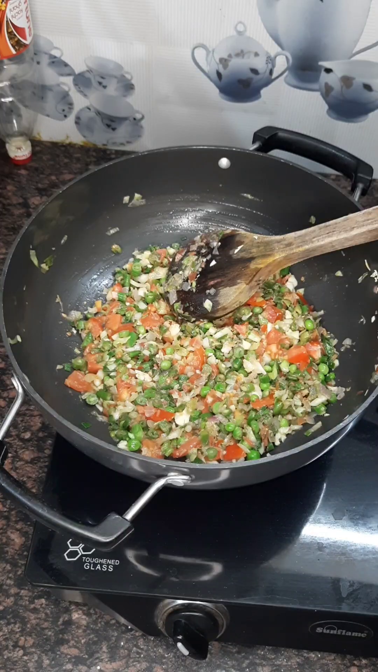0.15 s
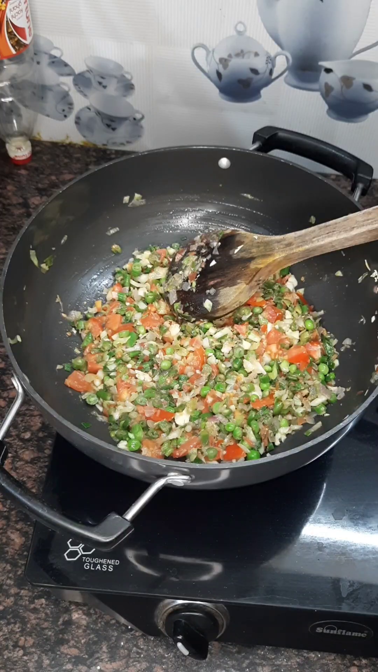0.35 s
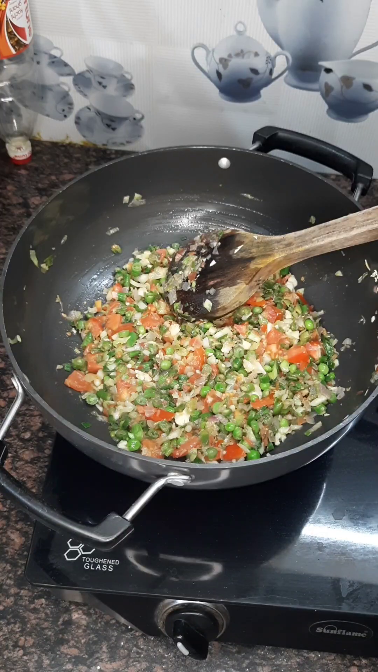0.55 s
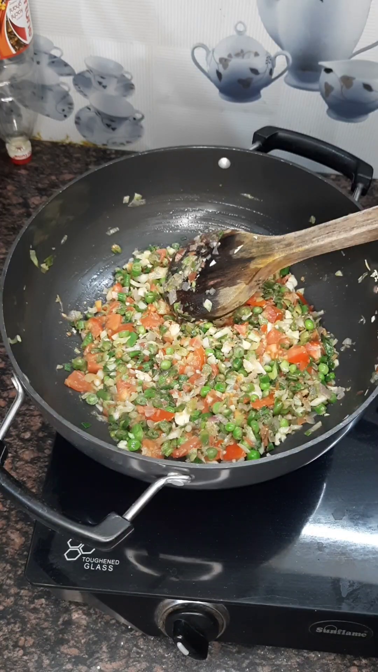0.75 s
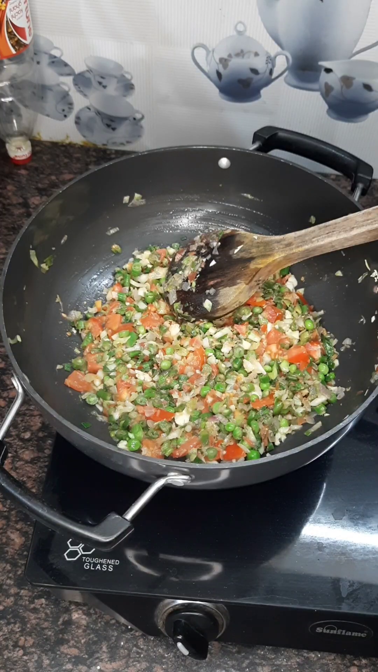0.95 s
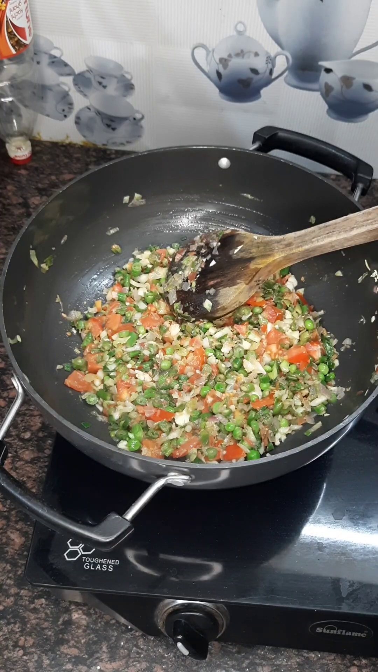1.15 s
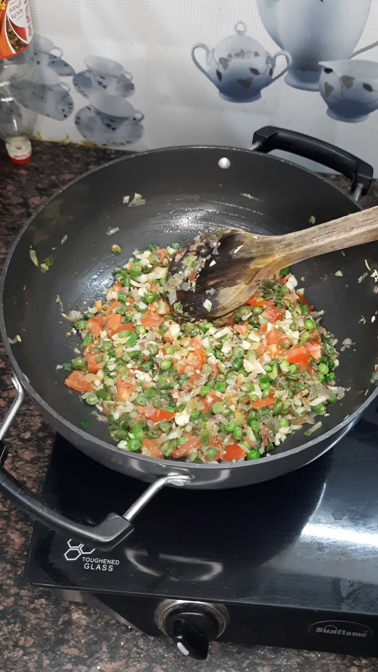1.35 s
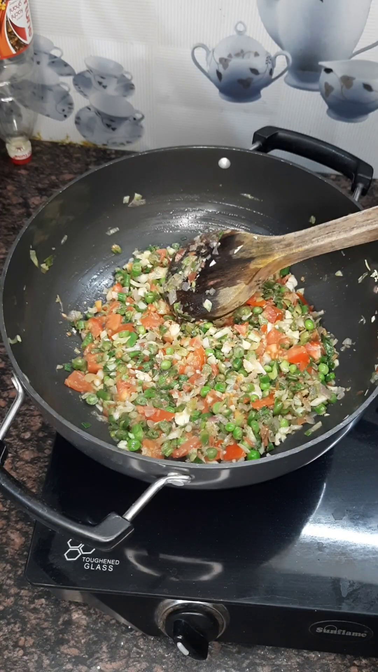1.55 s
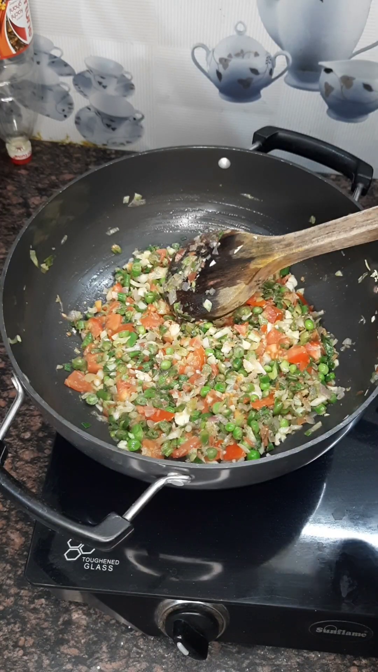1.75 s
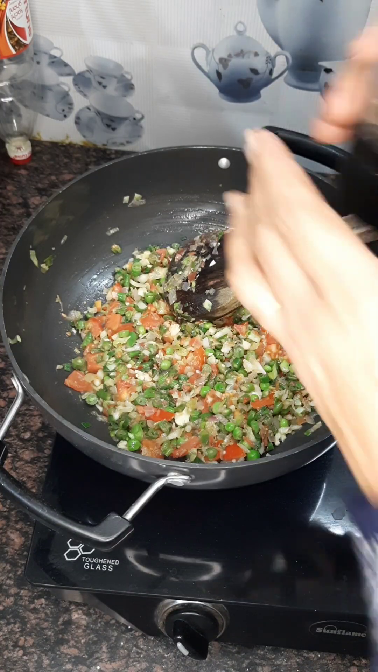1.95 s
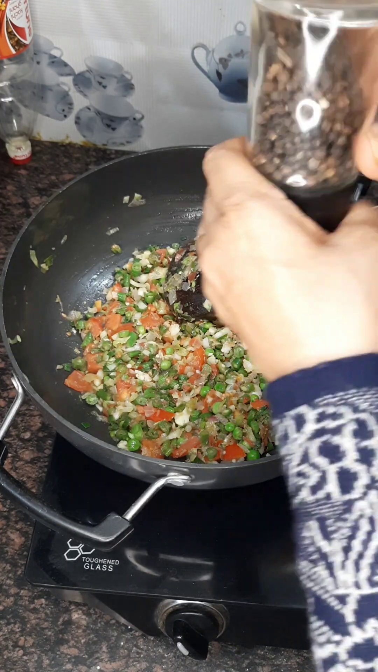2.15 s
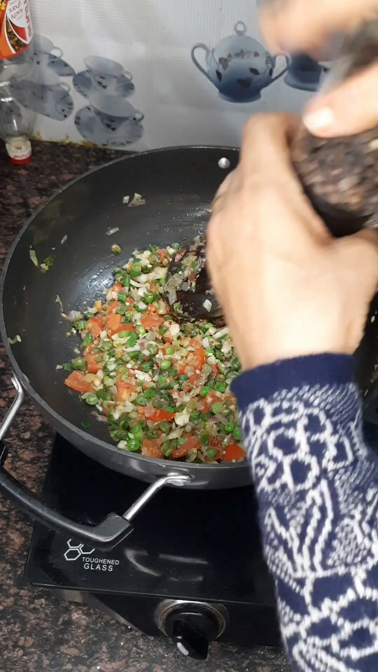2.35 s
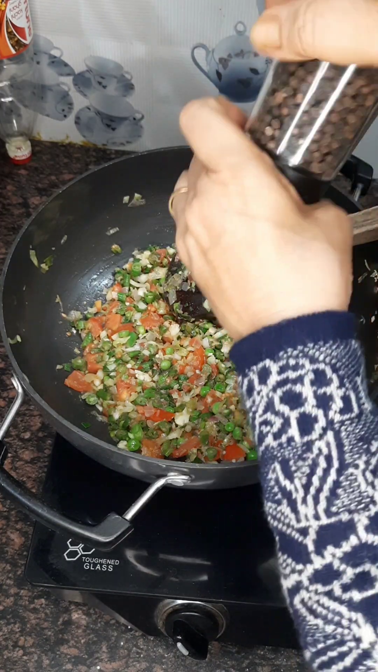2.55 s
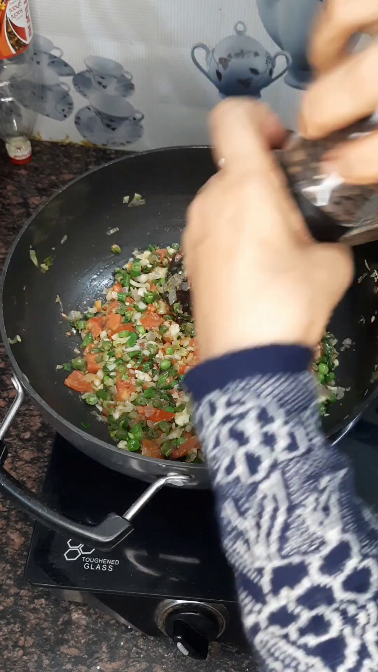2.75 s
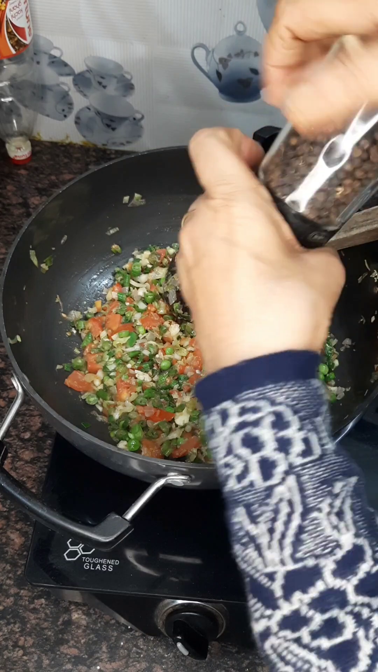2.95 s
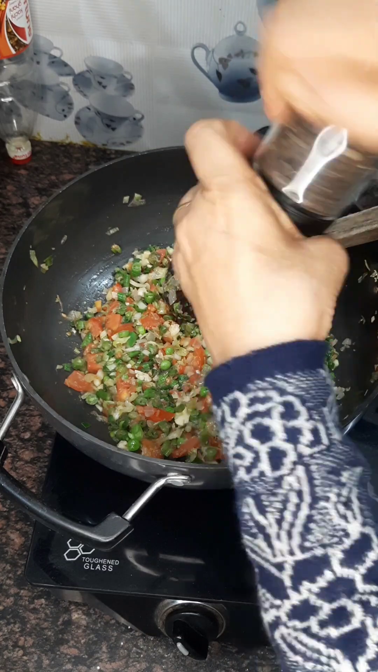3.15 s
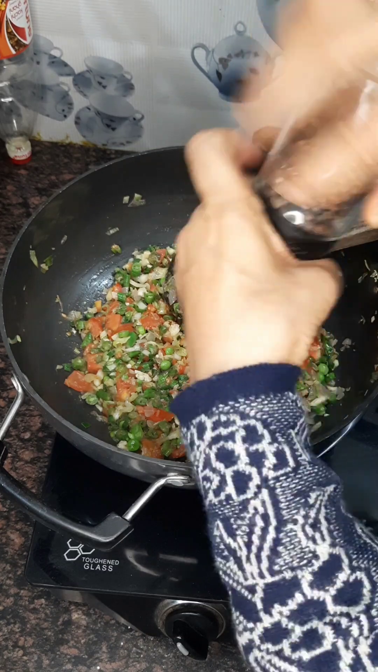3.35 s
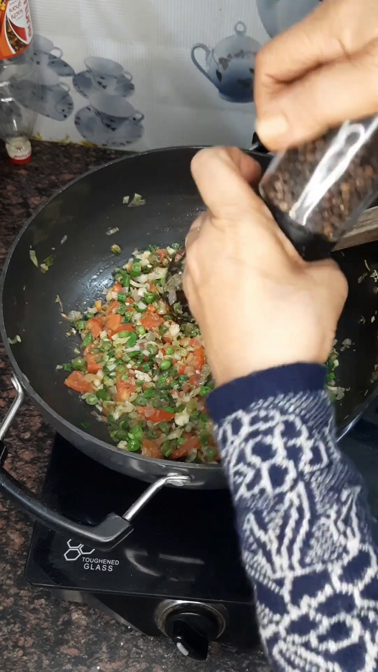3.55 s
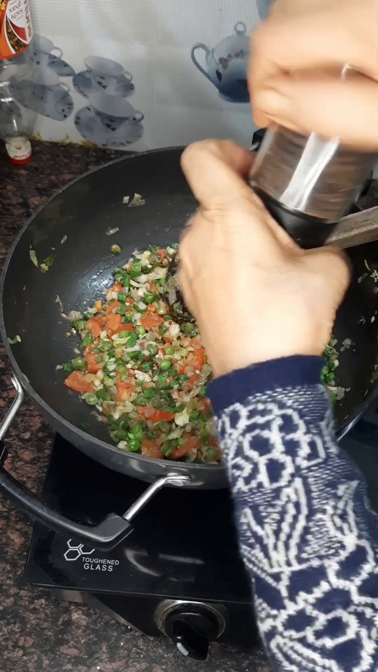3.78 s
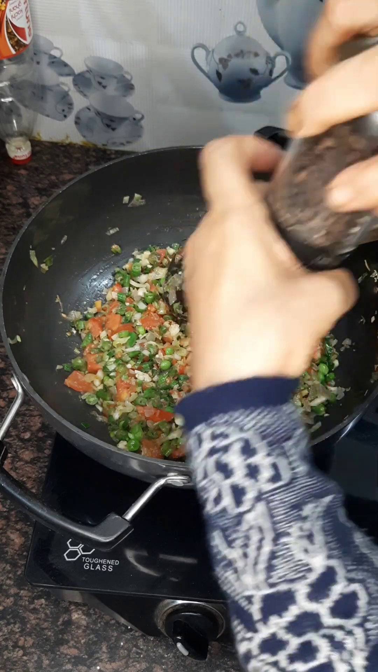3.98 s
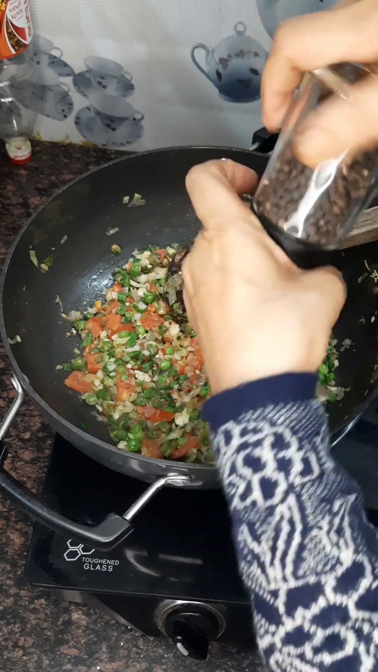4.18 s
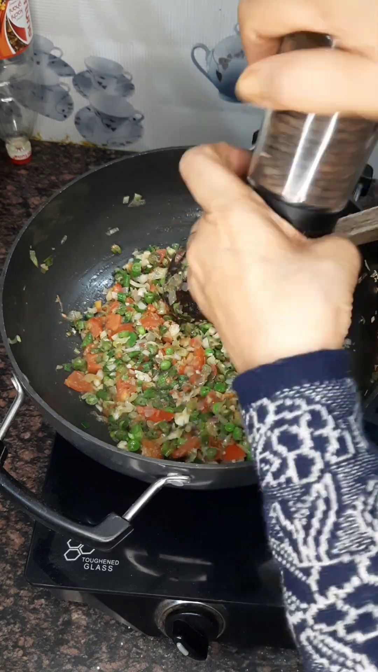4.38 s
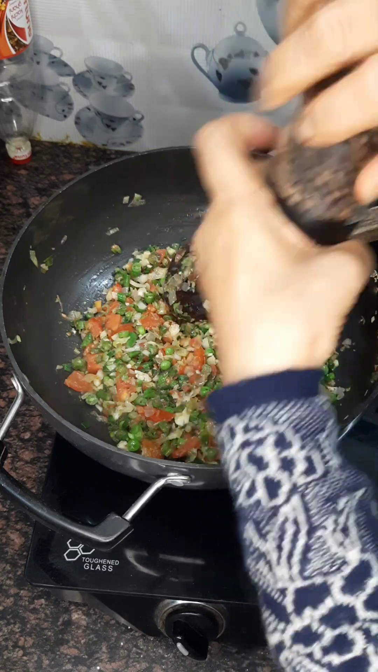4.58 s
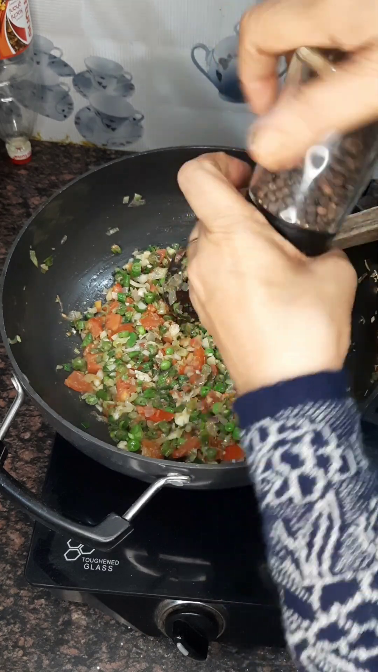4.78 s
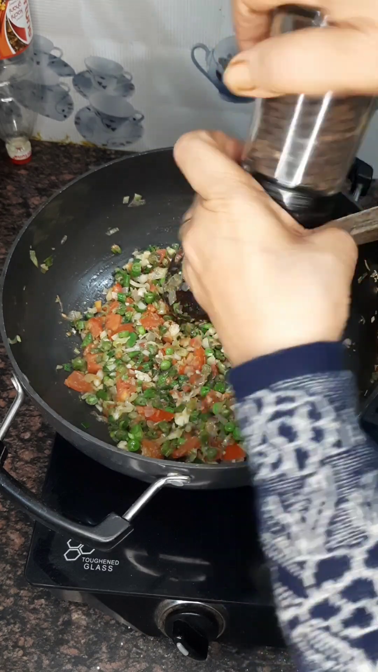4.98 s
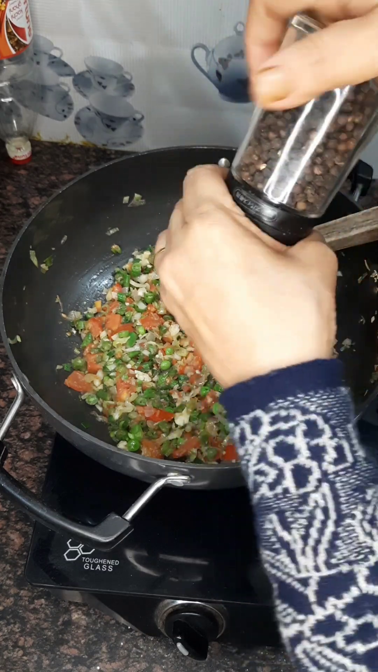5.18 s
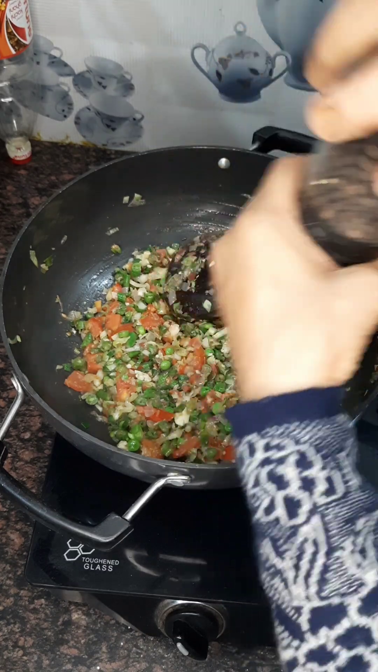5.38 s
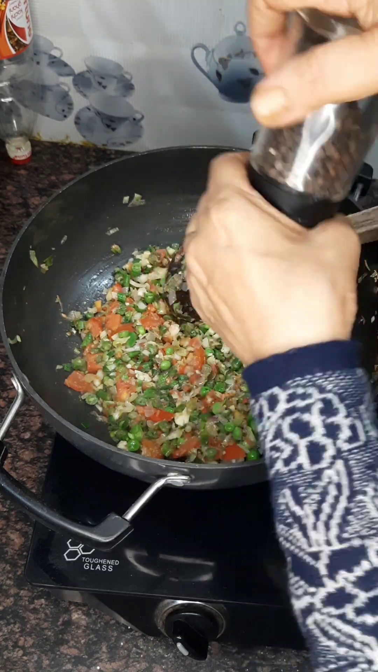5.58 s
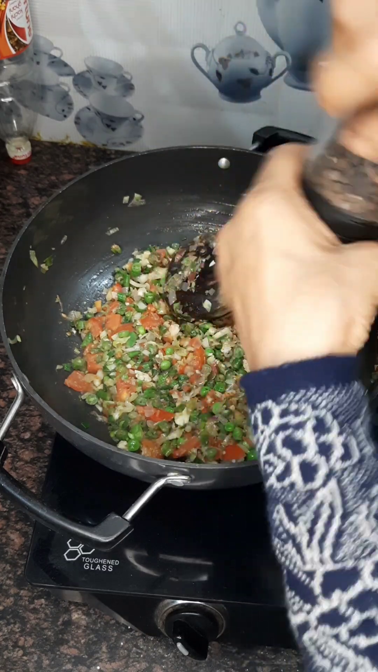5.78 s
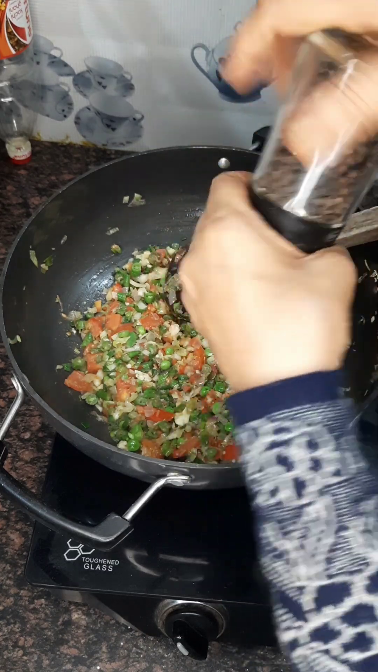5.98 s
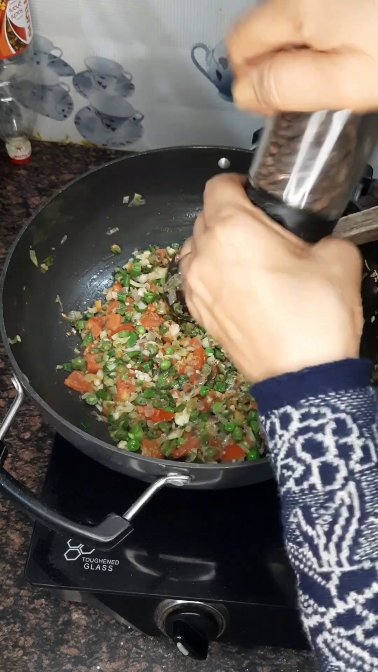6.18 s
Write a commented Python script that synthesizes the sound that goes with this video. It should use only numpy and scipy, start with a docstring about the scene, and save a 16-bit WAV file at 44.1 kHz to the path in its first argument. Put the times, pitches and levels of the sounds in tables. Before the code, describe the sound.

A cap knocks and scrapes off, then a glass pepper mill grinds in even, rasping twists over faint kitchen hiss.

```python
"""A glass pepper mill, twisted about three times a second in a tiled kitchen. The burr crunches corns
into grit that rings the mill's body; some corns crack aloud and loose ones tick on the glass.
Before the grinding, a cap is handled and pulled off with knocks and a scrape, and the jar is tipped
over a pan. Hiss, a drone, a low rumble and a few faint low tones fill the room."""
import sys
import numpy as np
from scipy import signal
from scipy.fft import rfft, irfft, next_fast_len
from scipy.io import wavfile
from scipy.ndimage import uniform_filter1d

SR = 44100
rng = np.random.default_rng(int(sys.argv[2]) if len(sys.argv) > 2 else 0)


def pcm_store(signal):
    """Save signal as 16-bit PCM."""
    levels = np.round(np.clip(np.atleast_2d(signal), -1, 1) * 32767)
    wavfile.write(sys.argv[1], SR, levels.astype(np.int16).T)


N = 274743
TIME_S = np.arange(N) / SR


def amp(db):
    return 10 ** (np.asarray(db) / 20)


def unit_rms(x):
    return x / np.sqrt(np.mean(x ** 2) + 1e-20)


def log_interp(points, hz):
    f, values = np.transpose(points)
    return np.interp(np.log(hz + 1), np.log(f + 1), values)


def curves(rows):
    """One value per sample for each column after the time."""
    times, *columns = np.transpose(rows)
    return [np.interp(TIME_S, times, column) for column in columns]


def filtered(x, response):
    size = next_fast_len(x.shape[-1] + 8192)
    return irfft(rfft(x, size) * response(np.fft.rfftfreq(size, 1 / SR)), size)[..., :x.shape[-1]]


def modes(table):
    """Causal frequency response of a set of resonances."""
    return lambda f: sum(amp(db) * 1j * f * width / (centre ** 2 - f * f + 1j * f * width)
                         for centre, width, db in table)


def ring(x, table):
    """Two passes through the resonances; rms 1."""
    return unit_rms(filtered(x, lambda hz: modes(table)(hz) ** 2))


def coloured(x, spectrum):
    """Minimum-phase filter through (frequency [Hz], level [dB]) points."""
    cepstrum = irfft(log_interp(spectrum, np.fft.rfftfreq(2048, 1 / SR)) * np.log(10) / 20)
    cepstrum[1:1024] *= 2
    cepstrum[1025:] = 0
    return signal.fftconvolve(x, irfft(np.exp(rfft(cepstrum))))[:len(x)]


def grains(per_s, spread_db):
    """Random impulses of uneven size; rms 1."""
    size_db = spread_db * np.minimum(rng.exponential(size=N), 3)
    return unit_rms((rng.random(N) < per_s / SR) * rng.standard_normal(N) * amp(size_db))


def flutter(depth_db, below_hz):
    """Randomly wandering gain."""
    return amp(depth_db * unit_rms(filtered(rng.standard_normal(N), lambda hz: hz < below_hz)))


def stroke_db(full_s, rise_s, hold_s, fall_db_per_s):
    """Climbs 31 dB per rise_s, holds at 0 dB from full_s, then falls."""
    t = TIME_S - full_s
    return np.minimum(31 * t / rise_s, 0) - fall_db_per_s * np.maximum(t - hold_s, 0)


# Diffuse field: (frequency [Hz], left-right correlation [ratio])
CORRELATION = [(60, 0.98), (150, 0.92), (380, 0.86), (950, 0.053), (2380, 0.22), (5980, 0.086),
               (15000, 0.17)]


def diffuse(pair):
    """Two unrelated signals become left and right, alike in the bass only."""
    angle = lambda hz: np.arccos(log_interp(CORRELATION, hz)) / 2
    mid, side = filtered(pair, lambda hz: np.array([np.cos(angle(hz)), np.sin(angle(hz))]))
    return np.array([mid + side, mid - side])


# Kitchen reverberation: (frequency [Hz], T60 [s])
WALL_T60 = [(100, 1), (500, 0.35), (2000, 0.38), (6000, 0.41), (14000, 0.28)]


def room(x, wet_db, pan_db, left_lag_samples):
    """Panned direct sound plus a tail in which each frequency dies at its own speed."""
    hz, t, bins = signal.stft(rng.standard_normal((2, SR // 2)), SR, nperseg=256)
    tail = signal.istft(bins * amp(-60 * t / log_interp(WALL_T60, hz)[:, None]), SR, nperseg=256)[1]
    tail *= 1 + 0.5 * np.exp(-np.arange(tail.shape[1]) / SR / 0.0092)  # near tiles and hob answer first
    tail = np.pad(tail / np.linalg.norm(tail[0]), ((0, 0), (90, 0)))
    wet = diffuse(signal.fftconvolve(x[None], tail, axes=1)[:, :len(x)])
    direct = np.array([np.roll(x, left_lag_samples), x]) * amp([[pan_db / 2], [-pan_db / 2]])
    return direct + amp(wet_db) * wet


def patchy_noise(spectrum, depth_db):
    """Stereo noise with patches of random gain in time and frequency; rms 1."""
    bins = signal.stft(rng.standard_normal((2, N + 512)), nperseg=512)[2]
    patches = uniform_filter1d(rng.standard_normal(bins.shape[1:]), size=5, axis=0)
    patches = uniform_filter1d(patches, size=12, axis=1)
    pair = signal.istft(bins * amp(depth_db * unit_rms(patches)), nperseg=512)[1][:, :N]
    return unit_rms(diffuse(filtered(pair, lambda hz: amp(log_interp(spectrum, hz)))))


# Room noise spectra: (frequency [Hz], relative density [dB])
HISS_SPECTRUM = [(290, -33), (500, -9), (670, -5), (1200, -3), (2100, -5), (4200, -7.5), (5000, -8.5),
                 (7500, -9), (9000, -10.5), (10500, -18.5), (12000, -7), (14000, -12.5), (15200, -9),
                 (16500, -32)]
DRONE_SPECTRUM = [(59, -14), (100, -13.5), (131, 1.5), (156, -12), (184, -3.5), (374, -3), (501, 4),
                  (576, -16.5), (700, -18), (910, -77), (1540, -120)]
RUMBLE_SPECTRUM = [(12, -48), (20, -75), (59, -7.5), (97, -9.5), (130, -8), (170, -47), (290, -120)]
# Hiss envelope: (time [s], level [dB])
HISS_LEVELS = [(0, -50.5), (.55, -50), (1.1, -50), (1.8, -50), (2.2, -50), (2.4, -54.5), (2.8, -51),
               (3.4, -51), (4.3, -50.5), (5.3, -50.5), (6.23, -49.5)]
# Low noise envelopes: (time [s], rumble [dB], drone [dB])
LOW_LEVELS = [(0.0, -70, -61), (0.38, -77, -63.5), (0.68, -69, -59.5), (1.18, -65, -67.5), (1.34, -57, -51),
              (1.42, -57.5, -45), (1.7, -75, -60.5), (2.43, -79.5, -65), (2.69, -69, -58.5),
              (3.31, -71, -60), (3.85, -69, -60.5), (4.62, -73, -57), (5.48, -68, -58.5), (6.23, -66, -54)]


def kitchen_air():
    """A near-steady hiss over a wavering drone and rumble."""
    rumble_db, drone_db = curves(LOW_LEVELS)
    hiss = amp(curves(HISS_LEVELS)[0]) * patchy_noise(HISS_SPECTRUM, depth_db=-0.5)
    drone = amp(drone_db) * patchy_noise(DRONE_SPECTRUM, depth_db=4.5)
    rumble = amp(rumble_db) * patchy_noise(RUMBLE_SPECTRUM, depth_db=3.5)
    return hiss + drone + rumble


# Contact bands: (frequency [Hz])
CONTACT_HZ = [250, 700, 2000, 4500, 7500, 13000]
# Contact colour by kind: (level [dB] in each band)
CONTACT_DB = {"tap": [-21.5, -29, -1, -20.5, -27, -26], "clunk": [-22.5, -7, -1.5, -11, -29.5, -29], "pull":
              [-37.5, -20.5, -12.5, -11, -17, -10.5], "hollow": [-25, 4.5, -31, -11, -27, -33], "click":
              [-40, -45, -0.5, -8, -16.5, -17], "thud": [-6, -19, -35, -40, -40, -40]}
# Cap resonances: (frequency [Hz], width [Hz], gain [dB])
CAP_MODES = [(196.6, 26, 20.5), (275, 19, 9.5), (406, 113, 13), (516, 22, 5), (785, 59, 11.5),
             (1074, 78, -2), (2480, 450, -4), (3830, 140, 0), (7100, 630, 10)]
# Contacts: (time [s], energy [dB], kind, tilt [dB/octave], swell [s], reverb [dB])
CAP_KNOCKS = [(0.5807, -4.5, "tap", 1.1, 0.00064, 0), (0.598, -7.5, "tap", 2.2, 0.002, 0),
              (0.599, -16, "thud", 1, 0.013, 2.5), (0.711, -10, "tap", 3.5, 0.0017, 5),
              (0.729, -11.5, "clunk", -1.5, 0.0018, -1), (.814, -24, "pull", -2, 0.00084, 3),
              (1.131, -28.5, "clunk", -5, 0.0056, 11), (1.184, -8.5, "clunk", 1.8, 0.0026, 10.5),
              (1.267, -4, "clunk", 4.5, 0.0073, 3.1), (1.28, -1.5, "hollow", -4.5, 0.0047, -2.5),
              (1.304, -18.5, "tap", 3, 0.0034, 12.5), (1.383, -7, "clunk", 6, 0.0017, -6),
              (1.3887, 14.5, "pull", 0, 0.0033, -0.5), (1.399, 11.5, "pull", 0.7, 0.018, 3),
              (1.439, 9.5, "pull", 1, 0.0024, 2), (1.7215, -3, "click", 3.8, 0.00036, 0),
              (2.108, -26, "thud", 2.5, 0.023, 2.5)]


def cap_knocks():
    """Each contact is a brief scrape that rings the cap and echoes off the tiles."""
    out, t = np.zeros((2, N + SR)), np.arange(SR // 2) / SR
    octaves = np.log2(np.array(CONTACT_HZ) / 1000)
    for start_s, db, kind, tilt_db, swell_s, wet_db in CAP_KNOCKS:
        u = t / swell_s
        bins = rfft(rng.standard_normal(len(t)) * u * u * np.exp(-2 * u))
        flat_scrape = irfft(bins / uniform_filter1d(np.abs(bins), size=150)) * (u < 8)
        density_db = CONTACT_DB[kind] + (tilt_db - 10 * np.log10(2)) * octaves  # band energy to density
        blow = coloured(flat_scrape, [(130, density_db[0] - 25), *zip(CONTACT_HZ, density_db)])
        knock = filtered(blow, lambda hz: 1.33 + modes(CAP_MODES)(hz))
        echoed = room(knock / np.linalg.norm(knock), wet_db, pan_db=2.0, left_lag_samples=8)
        out[:, round(start_s * SR):][:, :len(t)] += amp(db) * echoed
    return out[:, :N]


# Tones: (time [s], length [s], start pitch [Hz], end pitch [Hz], level [dB])
LOW_TONES = [(1.144, 0.19, 51.6, 51.3, -54.5), (2.603, 1.6, 53, 61.9, -72), (4.838, 0.37, 275, 288, -60),
             (5.1, 0.46, 75, 79, -64), (5.557, 0.28, 186, 189.4, -60.5), (5.908, 0.26, 282, 287, -51.5)]


def low_tones():
    """Faint sines that swell, glide a little and fade."""
    out = np.zeros(N)
    for start_s, length_s, start_hz, end_hz, db in LOW_TONES:
        progress = np.clip((TIME_S - start_s) / length_s, 0, 1)
        phase = 2 * np.pi * np.cumsum(start_hz + (end_hz - start_hz) * progress) / SR
        out += amp(db) * np.sqrt(2 * np.sin(np.pi * progress)) * np.sin(phase)
    return out


# Glass resonances, upper, lower and loosely held: (frequency [Hz], width [Hz], gain [dB])
UPPER_GLASS = [(13030, 320, 0)]
LOWER_GLASS = [(7610, 330, 0)]
LOOSE_GLASS = [(3890, 320, -1.5), (803, 94, -2.5)]
# Jar tipping, held loosely: (time [s], ring [dB], slide [dB])
JAR_TIP = [(1.86, -82, -68), (1.92, -49.5, -50), (1.965, -52, -48), (1.985, -57, -44), (2.04, -62, -61),
           (2.1, -64, -49), (2.15, -60, -51), (2.22, -78, -72), (2.3, -73, -80)]
# Corns rolling: (time [s], hold [s], upper ring [dB], lower ring [dB])
CORN_ROLLS = [(2.013, 0.029, -52, -49), (2.117, 0.036, -66, -56), (2.163, 0.029, -55, -66),
              (2.51, 0.082, -53, -59), (2.657, 0.088, -63.5, -66.5), (2.846, 0.11, -45.5, -47.5),
              (3.144, 0.12, -45.5, -47.5), (3.355, 0.017, -62, -79), (3.458, 0.084, -46, -45),
              (3.778, .12, -44.5, -47), (4.051, 0.14, -45, -47), (4.376, 0.15, -46, -52),
              (4.657, 0.15, -46.5, -50.5), (4.975, 0.11, -43, -48), (5.408, 0.032, -53, -61),
              (5.543, 0.093, -48.5, -48), (5.72, 0.06, -55, -63.5), (5.859, 0.1, -45, -47.5),
              (6.143, .09, -42, -46)]


def loose_corns():
    """Corns slide as the jar tips, then tumble unevenly, ticking on the glass and ringing its modes."""
    upper_gain, lower_gain = sum(
        amp(np.array(ring_db)[:, None] + stroke_db(full_s, 0.033, hold_s, fall_db_per_s=233))
        for full_s, hold_s, *ring_db in CORN_ROLLS)
    tumble = flutter(depth_db=3.5, below_hz=25)
    ticks = grains(per_s=450, spread_db=2.5)
    rolling = tumble * (upper_gain * ring(ticks, UPPER_GLASS) + lower_gain * ring(ticks, LOWER_GLASS))
    slide = unit_rms(filtered(grains(per_s=3000, spread_db=8), modes([(12100, 14000, 0)])))
    start_s, end_s = JAR_TIP[0][0], JAR_TIP[-1][0]
    tipping = np.interp(TIME_S, [start_s - 0.02, start_s, end_s, end_s + 0.02], [0, 1, 1, 0])
    loose_gain, slide_gain = tipping * amp(curves(JAR_TIP))
    return rolling + loose_gain * ring(ticks, LOOSE_GLASS) + slide_gain * slide


# Grit spectrum: (frequency [Hz], relative density [dB])
BURR_SPECTRUM = [(88, -68), (150, -20), (348, -5.5), (601, -3.5), (716, -16.5), (941, 1.5), (1080, 7),
                 (3220, -2), (4580, -19), (5910, -13), (10600, -21.5), (12900, -19), (16000, -18)]
# Resonances of the body and of the air in the mill's mouth: (frequency [Hz], width [Hz], gain [dB])
BODY_MODES = [(1160, 1700, -4.5), (2710, 280, -0.5), (364, 220, -20)]
MOUTH_MODES = [(734, 90, 0)]
# Twists: (full force [s], rise [s], hold [s], crunch [dB], mouth re crunch [dB], bass re crunch [dB])
WRIST_TWISTS = [(2.558, 0.12, 0.027, -50.5, -5.5, -14), (2.897, 0.092, 0.028, -46, -2, -17),
                (3.223, 0.12, 0.027, -43, -2, -14.5), (3.534, 0.14, 0.021, -43.5, -6.5, -11.5),
                (3.833, 0.12, 0.053, -43, -7, -15), (4.123, 0.089, 0.052, -45, -6, -15),
                (4.438, 0.1, 0.016, -42, -3.5, -14.5), (4.719, 0.077, 0.036, -44, -7.5, -10.5),
                (5.003, 0.078, 0.068, -47.5, -9.5, -7.5), (5.574, 0.1, 0.028, -43, -9, -8.5),
                (5.884, 0.066, 0.056, -44.5, -4.5, -6.5), (6.171, 0.027, .07, -48.5, -8, -3.5)]


def burr_crunch():
    """The burr breaks corns into clumps of grit that ring body and mouth; the bass varies with grip."""
    bass_hz, treble_hz, treble_db = 577, 5500, 5.5
    treble_lead_s, linger_s, fall_db_per_s = 0.014, 0.014, 324
    clumps = flutter(depth_db=2.4, below_hz=120)
    fractures = clumps * grains(per_s=4000, spread_db=-1.0)
    grit = filtered(coloured(fractures, BURR_SPECTRUM), lambda hz: 1 + modes(BODY_MODES)(hz))
    below_treble = filtered(grit, lambda hz: 1 / (1 + (hz / treble_hz) ** 4))
    below_mid = filtered(grit, lambda hz: 1 / (1 + (hz / bass_hz) ** 4))
    bass, mid, treble = map(unit_rms, (below_mid, below_treble - below_mid, grit - below_treble))
    mouth = ring(fractures, MOUTH_MODES)
    out = np.zeros(N)
    for full_s, rise_s, hold_s, db, mouth_db, bass_db in WRIST_TWISTS:
        force = amp(db + stroke_db(full_s, rise_s, hold_s, fall_db_per_s))
        early = amp(db + stroke_db(full_s - treble_lead_s, rise_s, hold_s + treble_lead_s, fall_db_per_s))
        lingering = amp(db + stroke_db(full_s, rise_s, hold_s + linger_s, fall_db_per_s))
        out += force * mid + early * amp(treble_db) * treble
        out += lingering * (amp(mouth_db) * mouth + amp(bass_db) * bass)
    return out


# Corns cracking: (time [s], level [dB], frequency [Hz])
CORN_CRACKS = [(2.552, -35, 2860), (2.8412, -34, 12300), (2.9046, -20, 6680), (3.2064, -27.5, 6230),
               (3.2266, -28.5, 2660), (3.367, -47, 7610), (3.5325, -34, 2610), (3.862, -27, 6500),
               (4.123, -28.5, 7260), (4.403, -30, 12900), (4.6654, -39, 13100), (4.7094, -34, 14800),
               (4.7272, -19.5, 13800), (5.56, -40, 5500)]


def corn_cracks():
    """A corn snaps: a few cycles and a spit of treble noise, swelling within a millisecond."""
    out, t = np.zeros(N + SR), np.arange(400) / SR
    u = t / 0.00042
    for start_s, db, hz in CORN_CRACKS:
        snap = np.sin(2 * np.pi * hz * t) + 0.69 * np.diff(rng.standard_normal(len(t) + 1))
        out[round(start_s * SR):][:len(t)] += amp(db) * snap * u * np.exp(1 - u)
    return out[:N]


def scene():
    cracks = room(corn_cracks(), wet_db=-3, pan_db=-0.6, left_lag_samples=-1)
    crunch = room(burr_crunch(), wet_db=1.5, pan_db=0.5, left_lag_samples=-8)
    corns = room(loose_corns(), wet_db=0.0, pan_db=-3.5, left_lag_samples=-8)
    return crunch + corns + cracks + cap_knocks() + kitchen_air() + low_tones()


# Microphone port mismatch: (frequency [Hz], left over right [dB])
PORT_BALANCE = [(60, 1), (110, -1.5), (200, -1.5), (380, -1), (700, -1), (1290, 0), (2380, 0.5), (4400, -1),
                (8120, -3), (15000, 2.5)]


def record(dry):
    """Each port has its own colour; the loudest peaks round off; nothing passes above the band limit."""
    ceiling, top_hz = 0.9, 15900
    ports = filtered(dry, lambda hz: amp(log_interp(PORT_BALANCE, hz) * [[0.5], [-0.5]]))
    rounded = ports / (1 + np.abs(ports / ceiling) ** 4) ** (1 / 4)
    return filtered(rounded, lambda hz: hz < top_hz)


dry = scene()
out = record(dry)
pcm_store(out)
```